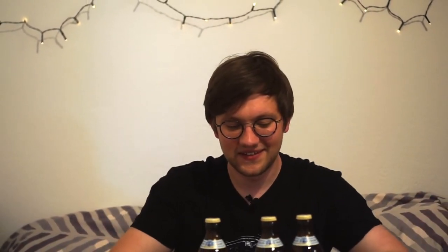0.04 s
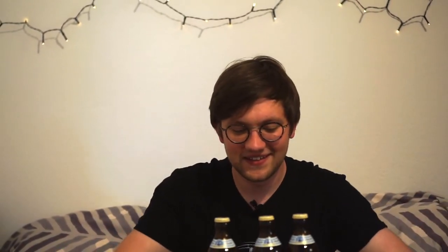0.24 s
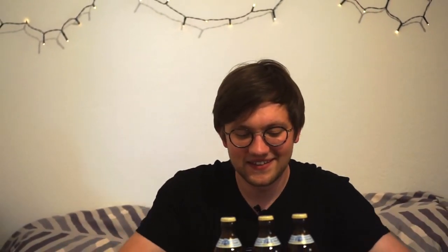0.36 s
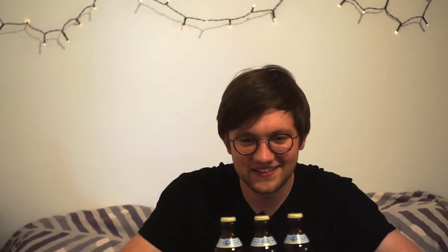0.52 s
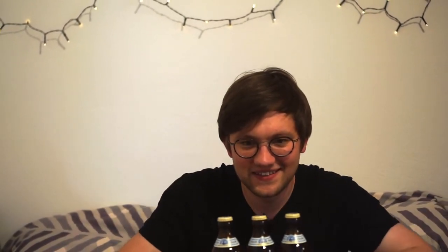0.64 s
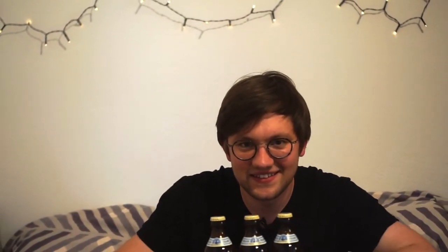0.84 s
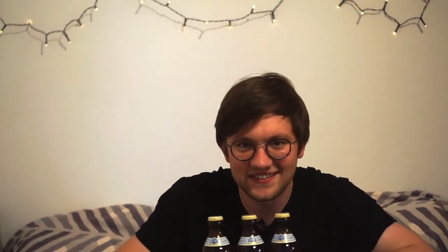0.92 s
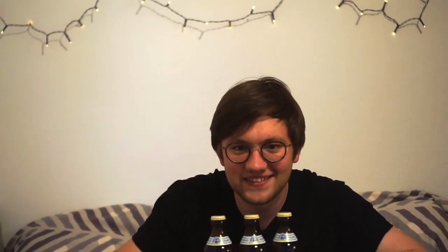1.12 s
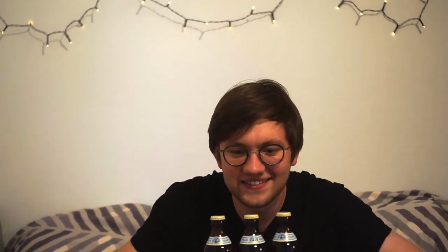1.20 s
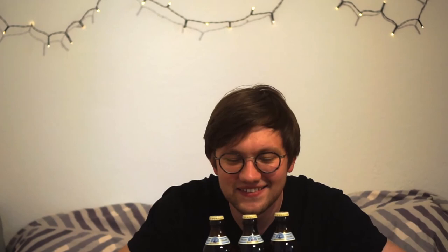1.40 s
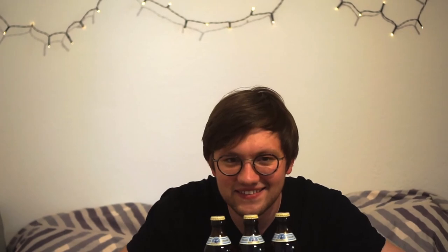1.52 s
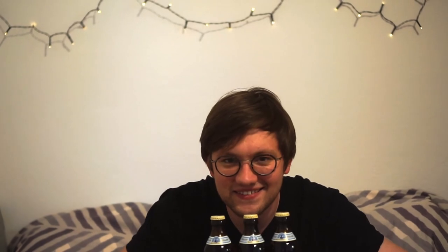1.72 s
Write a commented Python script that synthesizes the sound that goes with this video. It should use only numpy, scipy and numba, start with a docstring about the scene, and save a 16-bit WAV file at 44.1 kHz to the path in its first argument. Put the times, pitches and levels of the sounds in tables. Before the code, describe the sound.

Glass bottles scrape across a table, clinking together in two quick runs, then settle.

```python
"""A gritty scrape with small squeaks: three glass bottles slide over a table, their bases sticking and
slipping, close by in a small furnished room. They meet twice, each time chattering in a quick run of
clinks; every contact cracks, rings the glass and knocks the table top. The scrape dies away and the
bottles settle with faint rubs, soft bumps and one dry tap."""
import sys
import numpy as np
from scipy import signal
from scipy.fft import rfft, irfft
from scipy.io import wavfile
from numba import njit

SR = 44100
rng = np.random.default_rng(int(sys.argv[2]) if len(sys.argv) > 2 else 0)


def generate_wav(sig):
    """Save sig (samples, or channels by samples) to the path in sys.argv[1] as 16-bit PCM at SR."""
    pcm = np.round(np.clip(np.atleast_2d(sig).T, -1, 1) * 32767).astype(np.int16)
    wavfile.write(sys.argv[1], SR, pcm)


N = 77175
T = np.arange(N) / SR


def amp(db):
    """Decibels to gain."""
    return 10 ** (np.asarray(db) / 20)


def unit(x):
    """Scale to rms 1."""
    return x / np.sqrt(np.mean(x ** 2))


def shape(x, points):
    """EQ by a curve of (f/Hz, level/dB) points."""
    hz, db = np.array(points, float).T
    f = np.maximum(np.fft.rfftfreq(2 * N, 1 / SR), 1)
    return irfft(rfft(x, 2 * N) * amp(np.interp(np.log(f), np.log(hz), db)))[:N]


def noise(points):
    """Coloured noise of rms 1."""
    return unit(shape(rng.standard_normal(N), points))


def fade(start, t60):
    """Exponential decay from a start time."""
    return (T >= start) * amp(-60 * np.maximum(T - start, 0) / t60)


@njit
def resonate(x, hz, width):
    """State-variable band-pass with a moving centre."""
    y, band_state, low_state = np.empty(len(x)), 0., 0.
    for i in range(len(x)):
        g, damping = np.tan(np.pi * hz[i] / SR), width / hz[i]
        band = (band_state + g * (x[i] - low_state)) / (1 + g * (g + damping))
        band_state, low_state = 2 * band - band_state, low_state + 2 * g * band
        y[i] = damping * band
    return y


def grit(grains_per_s=5000, spread_db=2):
    """Dense stick-slip clicks of uneven size."""
    size = amp(spread_db * np.minimum(rng.exponential(size=N), 4))
    return (rng.random(N) < grains_per_s / SR) * size * rng.choice([-1, 1], N)


# Fader moves of the scrape: t/s, body/dB, hiss/dB, rumble/dB
SCRAPE_FADERS = [(0, -36, -38, -66.5), (0.018, -31, -40.5, -57), (0.058, -35.5, -42.5, -53.5),
                 (.14, -35.5, -45.5, -49.5), (.19, -38, -47.5, -49), (.28, -37, -42.5, -45),
                 (.36, -36.5, -42.5, -51), (.398, -41, -51.5, -52.5), (.425, -44, -54.5, -51),
                 (0.469, -40.5, -48, -51), (.495, -37, -44, -49.5), (0.533, -34.5, -45, -58.5),
                 (.56, -56, -53, -54), (.68, -45.5, -51, -60.5), (0.743, -60, -55, -61.5),
                 (.81, -45.5, -50.5, -60.5), (.94, -85, -52.5, -61), (1.02, -91, -86.5, -77)]
# Resonance of the sliding base: t/s, f/Hz
SCRAPE_PITCH = [(0, 623), (.1, 675), (.15, 630), (.2, 740), (.27, 603), (.375, 762), (.405, 902),
                (.48, 590), (.54, 630)]
# EQ of the scrape's body, its hiss and the table's rumble: f/Hz, level/dB
BODY_EQ = [(60, -19.5), (150, -14), (215, 5.5), (350, -1.5), (800, -0.5), (1250, -9.5), (1800, -5),
           (2800, -25), (5000, -35.5)]
HISS_EQ = [(1000, -27.5), (3200, -16), (5000, 0), (6000, 0), (7500, -2), (9500, -1), (11000, -3),
           (13000, -11), (15500, -20)]
RUMBLE_EQ = [(20, -22), (35, -8), (50, -1.5), (70, -5.5), (110, -10.5), (200, -19), (600, -58.5)]


def scrape(width_hz=190.):
    """Sliding bases: grit drives a wandering resonance, a broad body and a hiss over table rumble."""
    times, *faders = np.array(SCRAPE_FADERS).T
    body_gain, hiss_gain, rumble_gain = (amp(np.interp(T, times, db)) for db in faders)
    hz = np.interp(T, *np.array(SCRAPE_PITCH).T)
    base = unit(resonate(resonate(grit(), hz, width_hz), hz, width_hz))
    body = amp(-2.5) * base + amp(-4) * unit(shape(grit(), BODY_EQ))
    hiss = unit(shape(grit(), HISS_EQ))
    return body_gain * body + hiss_gain * hiss + rumble_gain * noise(RUMBLE_EQ)


# Squeak cues: t/s, length/s, start f/Hz, end f/Hz, level/dB
SQUEAKS = [(.003, .045, 620.4, 562, -31.5), (0.122, 0.021, 640, 620, -28), (0.373, 0.0356, 643, 989, -31),
           (0.684, 0.035, 990, 992, -39)]


def squeaks():
    """A base catches on the table: short, gliding stick-slip tones."""
    out = np.zeros(N)
    for start, length, start_hz, end_hz, db in SQUEAKS:
        progress = np.clip((T - start) / length, 0, 1)
        hz = start_hz + (end_hz - start_hz) * progress
        out += amp(db) * np.sin(np.pi * progress) * np.sin(2 * np.pi * np.cumsum(hz) / SR)
    return out


def ring(contacts, pitches, rings, wall_hz=5650, wall_width_hz=420, contact_s=.0009, phase_kick=.45):
    """Every contact adds energy to each mode and nudges its phase; one row per mode."""
    out = []
    start, db, tilt, wall_db = np.array(contacts, float).T
    at = (start * SR).astype(int)
    push = signal.windows.hann(int(contact_s * SR))
    for hz, (mode_db, t60) in zip(pitches, rings):
        scatter, side = rng.standard_normal((len(at), 2)).T
        near_wall = np.exp(-((hz - wall_hz) / wall_width_hz) ** 2)
        colour_db = tilt * np.log2(hz / wall_hz) + near_wall * wall_db
        kick = amp(mode_db + db + colour_db + 4 * scatter)  # 4 dB of scatter per hit
        energy, turns = np.zeros(N), np.zeros(N)
        energy[at] = kick ** 2
        retained = np.exp(-2 * np.log(1000) / (t60 * SR))
        size = np.sqrt(signal.lfilter([1], [1, -retained], energy + 1e-24))
        turns[at] = phase_kick * np.sign(side) * np.arcsin(np.minimum(kick / size[at], 1))
        # the contact time softens each attack
        size, phase = (np.convolve(v, push / push.sum())[:N] for v in (size, np.cumsum(turns)))
        out.append(size * np.sin(2 * np.pi * (hz * T + rng.random()) + phase))
    return np.array(out)


def blows(contacts, t60):
    """Envelope of a run of hits whose decays add in energy."""
    return np.sqrt(sum((amp(db) * fade(start, t60)) ** 2 for start, db, _, _ in contacts))


# EQ of the glass-on-glass transient: f/Hz, level/dB
CRACK_EQ = [(1200, -24.5), (1700, -6), (2400, -2.5), (2800, -15.5), (3700, -26.5), (4300, -17), (4700, 3),
            (5050, -8), (5700, 12), (6250, -5), (6700, 10), (7600, -12), (8800, -17), (9700, -3),
            (10200, -7.5), (11000, -7), (11800, -17), (13000, -16), (14000, -27.5), (15500, -36.5)]


def crack(contacts):
    """Glass hits glass: noise bursts with a faint tail, EQ last so that the valleys stay dark."""
    envelope = amp(-19.5) * blows(contacts, t60=.014) + amp(-23.5) * blows(contacts, t60=.18)
    white = rng.standard_normal(N)
    return shape(white * envelope, CRACK_EQ) / np.std(shape(white, CRACK_EQ))


# EQ of the struck table top: f/Hz, level/dB
KNOCK_EQ = [(30, -20), (60, -9.5), (140, -5), (215, 3.5), (290, -2.5), (420, 0.5), (800, -4.5),
            (1200, -3.5), (1900, -0.5), (2500, -10), (3200, -32)]
# The table's lowest mode: f/Hz, level/dB, t60/s
TABLE_MODE = (215, -47.5, 0.34)


def knock(contacts, thud_db):
    """Every contact knocks the table top and rings its lowest mode; the first adds a thud."""
    envelope = amp(-36) * blows(contacts, t60=.32) + amp(thud_db) * fade(contacts[0][0], t60=.025)
    flat_hits = [(start, db, 0, 0) for start, db, _, _ in contacts]
    return noise(KNOCK_EQ) * envelope + ring(flat_hits, TABLE_MODE[:1], [TABLE_MODE[1:]])[0]


# Clink cues of each meeting: t/s, level/dB, tilt/(dB per octave), wall-mode boost/dB
FIRST_CLINKS = [ (.2025, 5, -3.5, -19), (.2263, 3.5, -4, -1), (.2460, -1, -7.5, 0.5), (.2729, 2, 2.5, -3),
                (.2823, -5.5, -5.5, 9), (.2914, -4.5, -3, -4), (.2994, 2.5, -2.5, -5.5),
                (.3051, -8.5, 0.5, 7), (.3170, -8, -1.5, 2.5), (.3289, -10, -1.5, 7.5), (.3406, -14, -3, 2),
                (.3520, -9.5, -1.5, -0.5), (.3669, -10, -3, -3.5), (.3816, -18, -3.5, -1),
                (.3952, -22, -1.5, -10.5)]
SECOND_CLINKS = [(.5436, 0.5, 1.1, -4), (.5591, -1, 0, -0.5), (.5653, -4, 0, 13.5), (.5695, -5.5, 0, 2.5),
                 (.5817, 0, 2, 6), (.5892, -2, 2.2, 11), (.5991, -7, 0, 2), (.6122, -5, -0.31, 5),
                 (.6180, 0, 0, 5.5), (.6261, -1.5, -0.2, -5), (.6343, -6.5, 0, -3), (.6383, -3.5, 0, 4),
                 (.6480, -4, 0, -8), (.6560, -12.5, 0, -6.5), (.6660, -9.5, 0.96, 6.5), (.6740, -9, 1, 7.5),
                 (.6830, -23, 0.31, 3), (.7016, -32.5, -1, -8)]
# Glass modes of each pair of bottles: f/Hz
FIRST_HZ = [2430, 4571, 4747, 5517, 5652, 5762, 6598, 6753, 6837, 9110, 9648, 9915, 10418, 11068, 12740]
SECOND_HZ = [2385, 2445, 2520, 4749, 4876, 5117, 5519, 5655, 5787, 5848, 6138, 6619, 6757, 6845, 8110, 9636,
             10516, 10970, 11064, 12780]
# Ring-out of those modes, in the same order: level/dB, t60/s
FIRST_RING = [(-24, .28), (-35.5, .2), (-36.5, 0.39), (-27, 0.16), (-23.5, 0.15), (-26, .2), (-26, 0.12),
              (-27, .16), (-29.5, .16), (-35, 0.096), (-29, 0.16), (-42.5, 0.15), (-41.5, .2), (-42, .18),
              (-45.5, .18)]
SECOND_RING = [(-32.5, 0.25), (-37.5, 0.32), (-33.5, 0.23), (-26, 0.077), (-24, 0.12), (-33, 0.14),
               (-36.5, 0.072), (-27.5, 0.084), (-22, 0.1), (-29, .15), (-33, .16), (-22.5, 0.091),
               (-22, 0.2), (-23.5, .13), (-36.5, .12), (-29, 0.045), (-28.5, 0.13), (-39, 0.085),
               (-33.5, .13), (-38.5, 0.17)]
# Brief duck of the lowest glass mode: t/s, half width/s, depth/dB
RING_DIP = (0.3805, .016, -20.5)


def meeting(contacts, pitches, rings, crack_db, thud_db):
    """Two bottles chatter: a crack per contact, the knock of the table and ringing glass."""
    hits = amp(crack_db) * crack(contacts) + knock(contacts, thud_db)
    modes = ring(contacts, pitches, rings)
    dip_s, dip_width, dip_db = RING_DIP
    modes[0] *= amp(dip_db * np.exp(-((T - dip_s) / dip_width) ** 2))
    return hits + modes.sum(axis=0)


# Rub cues: t/s, length/s, level/dB, relative hiss/dB, relative rumble/dB
RUBS = [(0.781, 0.15, -44, -41, -32), (0.94, 0.043, -56, -5.5, -10.5), (1.044, 0.098, -71, -2.5, 6),
        (1.19, 0.043, -65.5, 2, -1.5), (1.249, 0.077, -68, -2.5, 10), (1.34, 0.12, -73.5, -3.5, 1.5),
        (1.46, 0.044, -63.5, -10.5, -25), (1.517, 0.051, -58, -8.5, -18.5), (1.601, 0.02, -62, -9, -12.5),
        (1.63, 0.048, -74.5, -7, -7.5)]
# EQ of a rub's body: f/Hz, level/dB
RUB_EQ = [(50, -15), (150, 0), (250, 2), (580, 6), (900, 1), (1300, -5.5), (2200, -12), (3000, -20.5),
          (6000, -44)]


def rubs(attack_s=.012, release_t60=.12):
    """Slow, dull shifts of the bottles on the table as they come to rest."""
    body, hiss, rumble = unit(shape(grit(), RUB_EQ)), unit(shape(grit(), HISS_EQ)), noise(RUMBLE_EQ)
    out = np.zeros(N)
    for start, length, db, hiss_db, rumble_db in RUBS:
        attack = np.clip((T - start) / attack_s + .5, 0, 1)
        release = np.where(T < start + length, 1, fade(start + length, release_t60))
        out += amp(db) * attack * release * (body + amp(hiss_db) * hiss + amp(rumble_db) * rumble)
    return out


# Settling bumps: t/s, level/dB, f/Hz, bandwidth/Hz, t60/s, glass ring/dB
BUMPS = [(.998, -55.5, 536, 150, 0.06, -52), (1.09, -48, 680, 142, 0.044, -52),
         (1.121, -73, 900, 1200, 0.022, -51), (1.194, -63.5, 450, 495, 0.05, -40),
         (1.219, -60, 1616, 1400, 0.0098, -65), (1.262, -57, 294, 394, 0.085, -54),
         (1.389, -72, 200, 299.5, 0.041, -54), (1.531, -47.5, 673, 300.7, 0.059, -47.5)]


def bumps(ring_stretch=1.5):
    """Soft knocks on the table barely ring the upper glass modes; free-standing bottles ring longer."""
    free_ring = [(db, t60 * ring_stretch) for db, t60 in SECOND_RING]
    contacts = [(start, glass_db, 1, 0) for start, *_, glass_db in BUMPS]
    out = ring(contacts, SECOND_HZ, free_ring)[3:].sum(axis=0)
    for start, db, hz, width, t60, _ in BUMPS:
        centre, white = np.full(N, float(hz)), rng.standard_normal(N)
        table = lambda x: resonate(resonate(x, centre, 1. * width), centre, 2. * width)
        out += amp(db) * table(white * fade(start, t60)) / np.std(table(white))
    return out


# EQ of the tap: f/Hz, level/dB
TAP_EQ = [(60, -14), (250, 5.5), (800, 5), (1300, 1), (1900, -21), (3000, -32.5), (8000, -35)]


def tap(at_s=1.4698, peak_db=-37.5):
    """A base taps the table top once: a dry, dull impulse."""
    push = shape(signal.unit_impulse(N, int(at_s * SR)), TAP_EQ)
    return amp(peak_db) * push / np.abs(push).max()


# EQ of the room tone: f/Hz, level/dB
ROOM_TONE_EQ = [(15, -29.5), (25, 5), (161, -7), (317, -17.5), (677, -14.5), (1480, -28), (1740, -27),
                (2410, -34.5), (6380, -27), (16000, -29.5)]


def room(dry, t60=.25, wet_db=-24, tone_db=-78.5):
    """A small furnished room adds a short tail and a quiet bed of room tone."""
    tail = rng.standard_normal(N) * fade(0, t60)
    wet = signal.fftconvolve(dry, tail / np.sqrt(np.sum(tail ** 2)))[:N]
    return dry + amp(wet_db) * wet + amp(tone_db) * noise(ROOM_TONE_EQ)


# EQ of the side channel, and spectrum of its flutter: f/Hz, level/dB
SIDE_EQ = [(500, -67.5), (2400, -25.5), (5000, -12), (7000, -6), (12000, -8)]
FLUTTER = [(3, -30), (10, 0), (30, 0), (80, -40)]


def widen(mid, side_db=-5):
    """The treble flutters a little between the ears."""
    quadrature = np.imag(signal.hilbert(mid))
    flutter = unit(np.tanh(2 * noise(FLUTTER)))
    side = amp(side_db) * shape(quadrature * flutter, SIDE_EQ)
    return np.array([mid + side, mid - side])


def scene():
    """The bottles slide, meet twice and settle in the room, in stereo."""
    sliding = scrape() + squeaks()
    first = meeting(FIRST_CLINKS, FIRST_HZ, FIRST_RING, crack_db=-5.5, thud_db=-19.5)
    second = meeting(SECOND_CLINKS, SECOND_HZ, SECOND_RING, crack_db=2, thud_db=-26)
    settling = rubs() + bumps() + tap()
    return widen(room(sliding + first + second + settling))


def record(dry, ceiling=.8, top_hz=15400):
    """A soft clip rounds the highest peaks and a steep low-pass cuts the top."""
    rounded = dry / (1 + (dry / ceiling) ** 8) ** (1 / 8)
    return signal.sosfilt(signal.ellip(8, .2, 70, top_hz, fs=SR, output="sos"), rounded)


dry = scene()
out = record(dry)
generate_wav(out)
```